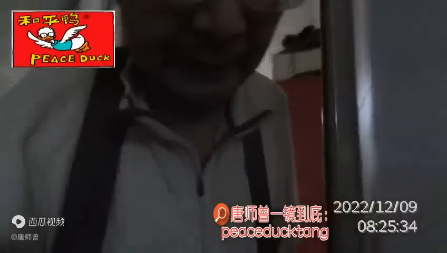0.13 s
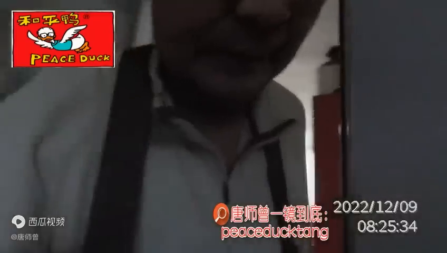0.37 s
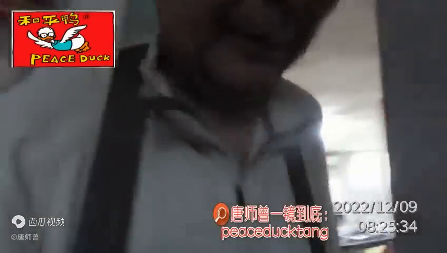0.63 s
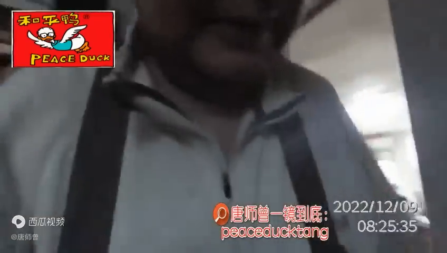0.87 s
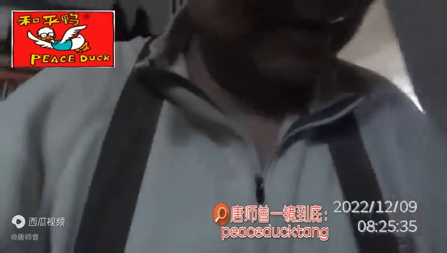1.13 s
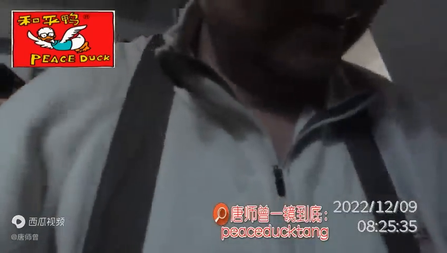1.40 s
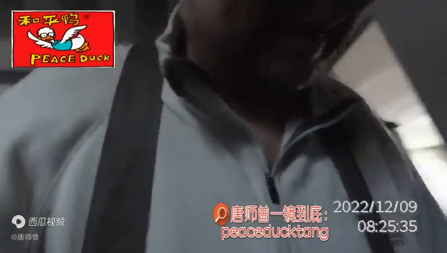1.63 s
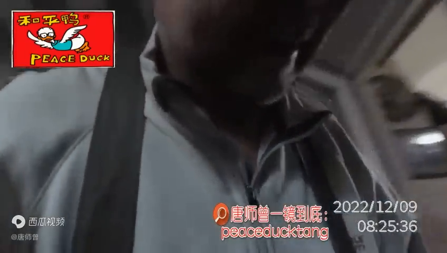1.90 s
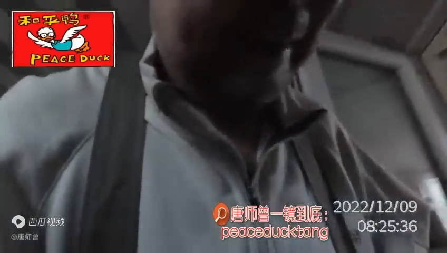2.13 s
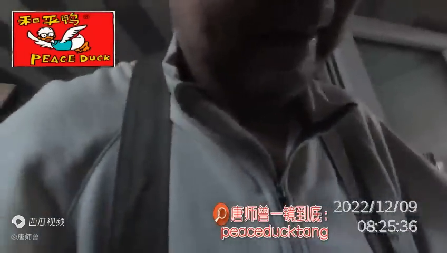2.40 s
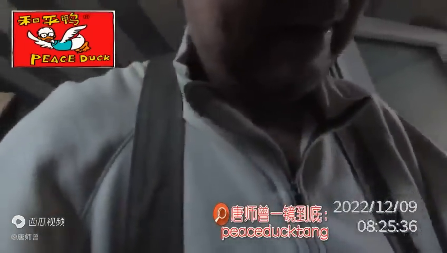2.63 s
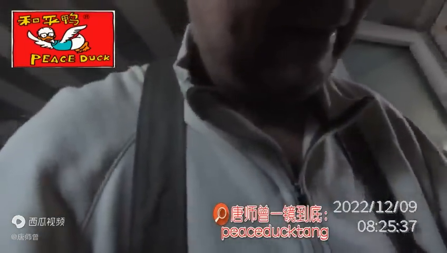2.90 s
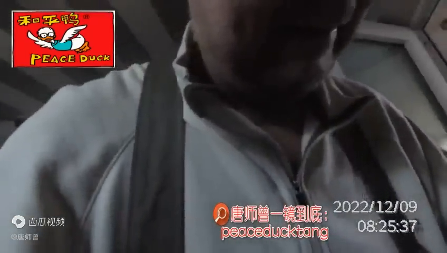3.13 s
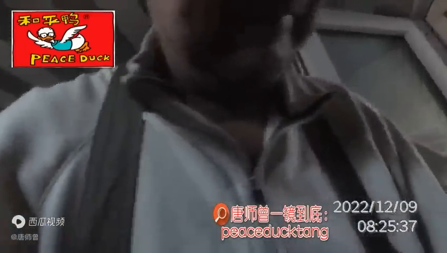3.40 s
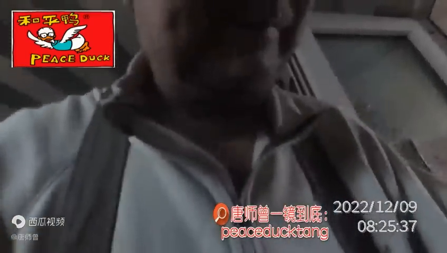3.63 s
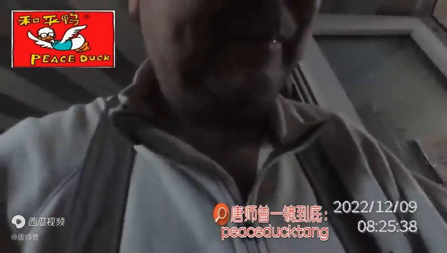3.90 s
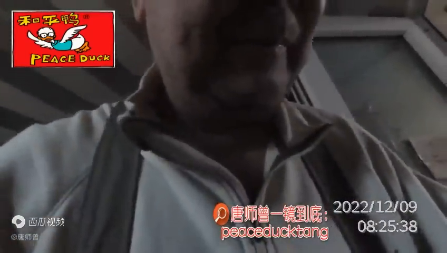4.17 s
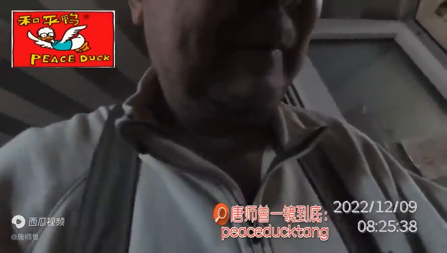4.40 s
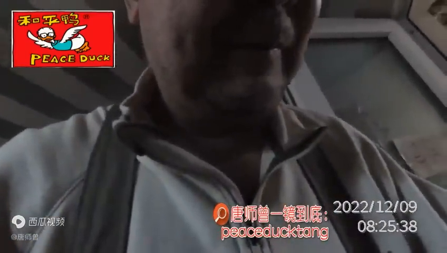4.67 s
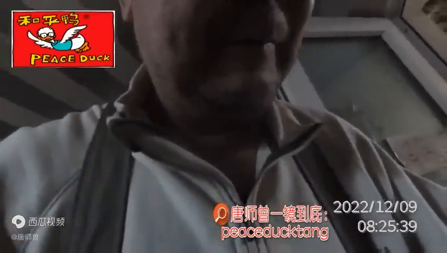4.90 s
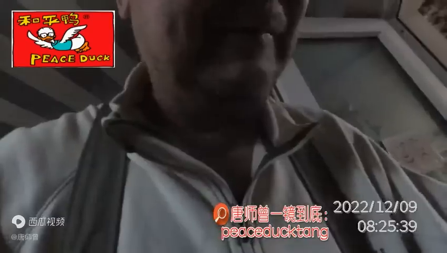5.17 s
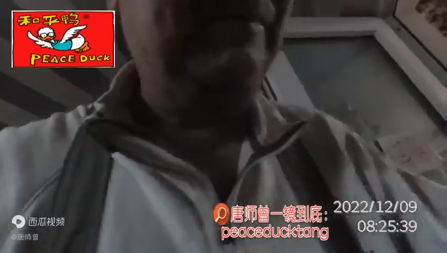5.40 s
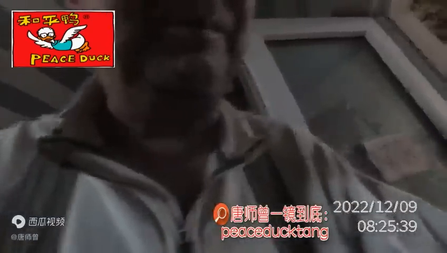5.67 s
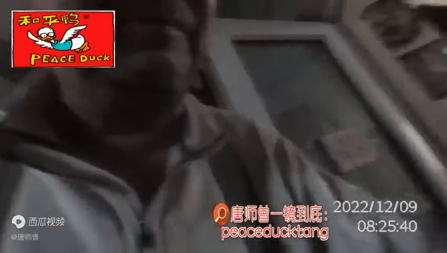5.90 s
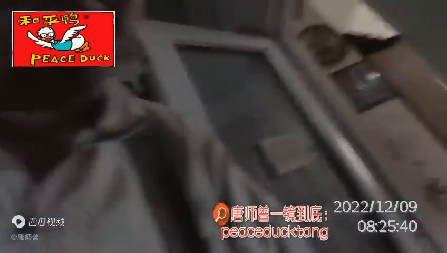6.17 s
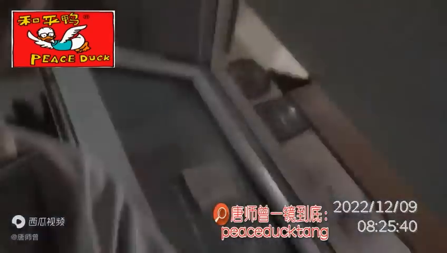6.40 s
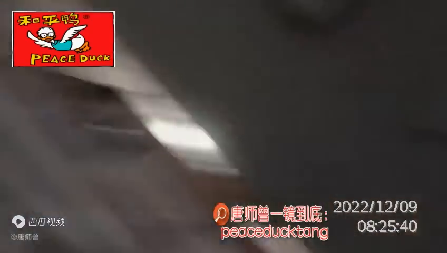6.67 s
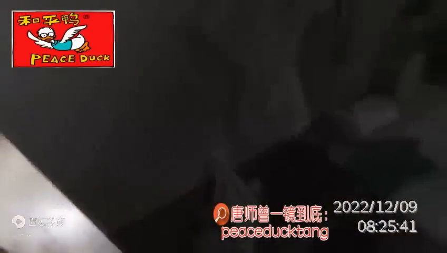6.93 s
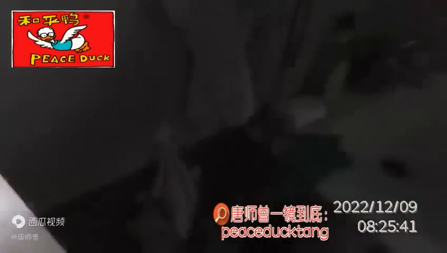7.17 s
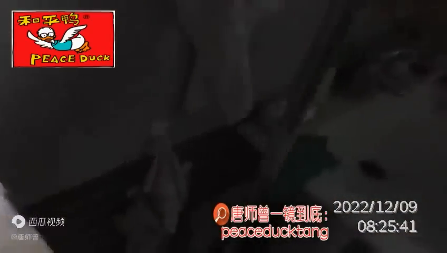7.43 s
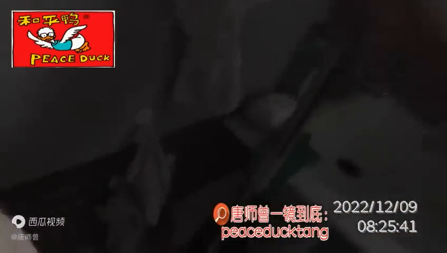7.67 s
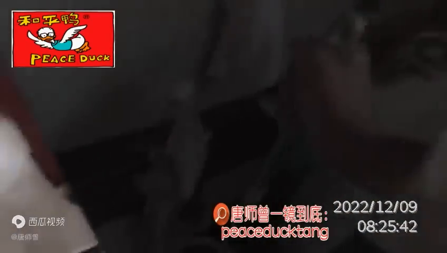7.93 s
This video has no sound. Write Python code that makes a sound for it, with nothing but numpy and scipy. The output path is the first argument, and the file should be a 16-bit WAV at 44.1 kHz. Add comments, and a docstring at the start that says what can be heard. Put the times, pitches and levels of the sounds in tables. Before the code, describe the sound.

Soft cloth rustles and hollow plastic thumps in a small bare room, then harsh handling bumps, a metallic jingle and distorted rattling knocks.

```python
"""Indoors, a towel is dragged over a hard floor with soft rustles and small ticks, over a faint hiss. From the
first half second hollow plastic is knocked, nudged and tapped: noise rings its body modes. After 4.5 s a
finger bumps and brushes the phone's left port, a nail snaps on the case, flat slaps fall and metal jingles.
At 5.5 s the phone is turned to face the work; then come loud close knocks that overload it. A small bare
room answers throughout as a short tail of diffuse noise."""
import sys
import numpy as np
from scipy import signal
from scipy.fft import rfft, irfft, next_fast_len
from scipy.io import wavfile
from scipy.ndimage import uniform_filter1d

SR = 44100
rng = np.random.default_rng(int(sys.argv[2]) if len(sys.argv) > 2 else 0)


def convert_level_to_amplitude(level_db):
    """Map a level in decibels to its linear amplitude factor."""
    exponent = np.asarray(level_db, float) / 20
    return 10 ** exponent


def wav_record(signal):
    """Record a signal, one row per channel, as 16-bit PCM in the file named by sys.argv[1]."""
    frames = np.transpose(np.atleast_2d(signal))
    bounded = np.clip(frames, -1, 1)
    # unit amplitude maps onto the largest positive 16-bit level
    quanta = np.round(bounded * 32767).astype(np.int16)
    wavfile.write(sys.argv[1], SR, quanta)


N = 355093
T = np.arange(N) / SR
# until the phone is turned, sound from the work reaches the left port this many samples late
TURN_S, LEFT_LAG = 5.5, 7

# modes of the hollow plastic body: f/Hz, level/dB, T60/s before ring() scales it by damp
BODY_MODES = [(258.5, -7, 0.089), (333.3, 3, 0.13), (401.8, 2, 0.16), (422.4, 9.5, 0.044), (494, 3, 0.052),
              (541, -3, 0.048), (643, -11.5, 0.14), (734.2, -14.5, 0.3)]
# colour of cloth noise: f/Hz, level/dB
CLOTH_COLOUR = [(88, -50), (150, -12.5), (427, -0.5), (1520, -2), (2170, -3.5), (3270, -5.5),
                (13000, -13.5)]
# rumble that the dragged towel sets up in the body: t/s, level/dB
DRAG_RUMBLE = [(0, -35.5), (.5, -41.5), (1.2, -57.5), (1.5, -53), (2.2, -36), (2.5, -37.5), (3.0, -28),
               (3.2, -51), (3.5, -55), (3.75, -29), (3.95, -54), (4.74, -40.5), (5.0, -22), (5.5, -50.5),
               (5.95, -44.5), (6.45, -43.5), (6.7, -22.5), (7.2, -28.5), (8.05, -24)]
# where the work lies across the two ports: t/s, lean to the left/dB
SIDE_OF_WORK = [(0, 3), (2.3, 4), (4.2, 8), (5.5, 3.5), (8.05, 2.5)]


def unit(x):
    """Scales to rms 1."""
    return x / np.sqrt(np.mean(x ** 2))


def colour(x, points):
    """Shapes the spectrum along the last axis by (Hz, dB) points; rms 1."""
    hz, db = np.transpose(points)
    size = next_fast_len(x.shape[-1])
    f = np.maximum(np.fft.rfftfreq(size, 1 / SR), 1)
    gain = convert_level_to_amplitude(np.interp(np.log(f), np.log(hz), db))
    return unit(irfft(rfft(x, size) * gain, size)[..., :x.shape[-1]])


def walk(rate, n=N):
    """Random levels held for 1 / rate s and slewed; spread near 1."""
    hold = int(SR / rate)
    steps = np.repeat(rng.standard_normal(n // hold + 1), hold)
    return 1.13 * uniform_filter1d(steps, hold)[:n]


def patchy(x, points, count, patchy_db, rate):
    """Noise of a given colour, in bands that each flicker on their own."""
    size, n = next_fast_len(x.shape[-1]), x.shape[-1]
    wide = rfft(colour(x, points), size)
    f = np.maximum(np.fft.rfftfreq(size, 1 / SR), 400)
    band = np.log(f / 400) / np.log(14000 / 400) * (count - 1)
    out = 0
    for k in range(count):
        share = np.clip(1 - np.abs(band - k), 0, 1)  # neighbouring bands overlap as triangles
        out = out + irfft(wide * share, size)[..., :n] * convert_level_to_amplitude(patchy_db * walk(rate, n))
    return out


def pair(n, alike):
    """Noise for the two ports that is partly the same."""
    noise = rng.standard_normal((3, n))
    return np.sqrt(alike) * noise[0] + np.sqrt(1 - alike) * noise[1:]


def burst(t, rise, t60):
    """Envelope that rises in about rise s while it dies away."""
    return (1 - np.exp(-t / rise)) * np.exp(-np.log(1000) * t / t60)


def swell(t, rise, t60):
    """Envelope that grows smoothly for rise s, then dies away."""
    grow = np.sin(np.pi / 2 * np.minimum(t / rise, 1)) ** 2
    return grow * np.exp(-np.log(1000) * np.maximum(t - rise, 0) / t60)


def ring(modes, t, damp, spread_db, detune):
    """One blow: decaying sines, each mode with its own strength and a slightly shifted pitch."""
    hz, db, t60 = np.transpose(modes)[:, :, None]
    chance = rng.standard_normal((2, len(modes), 1))
    strength = convert_level_to_amplitude(db + spread_db * chance[0])
    fade = np.exp(-np.log(1000) * t / (t60 * damp))
    pitch = hz * (1 + detune * chance[1])
    return np.sum(strength * fade * np.sin(2 * np.pi * pitch * t), axis=0)


def add(out, s, x, lean_db):
    """Mixes a sound in at time s, leaning left; the left port hears it late until the phone is turned."""
    for ch, (sign, lag) in enumerate([(0.97, LEFT_LAG * (s < TURN_S)), (-0.66, 0)]):
        i = int(s * SR) + lag
        part = np.broadcast_to(x, (2, x.shape[-1]))[ch, :N - i]
        out[ch, i:i + len(part)] += convert_level_to_amplitude(sign * lean_db / 2) * part


def hiss():
    """Steady faint noise, independent at the two ports, with bands that flicker."""
    # f/Hz, level/dB
    hiss_colour = [(20, -5), (333, -5), (1110, -5.5), (9000, -10), (13000, -5.5)]
    noise = rng.standard_normal((2, N))
    return patchy(noise, hiss_colour, count=5, patchy_db=5.5, rate=57) * convert_level_to_amplitude(-47)


def drag():
    """Towel fibres catch and slip: uneven small tugs shake the body, finer ones hiss."""
    rumble_db = np.interp(T, *np.transpose(DRAG_RUMBLE))
    # hiss gain at a rumble of -31 dB; it grows more slowly than the rumble
    away_db, facing_db, hiss_db_per_db = -43.5, -29, 0.75
    hiss_db = np.where(T < TURN_S, away_db, facing_db) + hiss_db_per_db * (rumble_db + 31)
    tugs = rng.standard_normal(N) * convert_level_to_amplitude(4.5 * walk(70) + 3 * walk(12))
    body = ring(BODY_MODES, T[:SR // 8], damp=0.64, spread_db=0, detune=0)
    rumble = unit(signal.fftconvolve(tugs, body)[:N])
    left = np.where(T < TURN_S, np.roll(rumble, LEFT_LAG), rumble)
    lean_db = np.interp(T, *np.transpose(SIDE_OF_WORK)) / 2 * np.array([[1], [-1]])
    rumble = np.array([left, rumble]) * convert_level_to_amplitude(rumble_db + lean_db)
    fibres = pair(N, 0.88) * convert_level_to_amplitude(2.5 * walk(400) + 2.5 * walk(60))
    return rumble + patchy(fibres, CLOTH_COLOUR, count=8, patchy_db=2.0, rate=38) * convert_level_to_amplitude(hiss_db)


def rustles():
    """Cloth crumples in soft puffs: flickering noise that swells and dies away."""
    # t/s, level/dB, rise/s, T60/s
    puffs = [(0.0, -28.5, 0.00068, 0.31), (0.181, -33.5, 0.013, 0.36), (0.451, -33.5, 0.018, 0.22),
             (.89, -27.5, 0.059, 0.14), (2.301, -38, 0.11, 0.5), (2.889, -27.5, 0.02, 0.5),
             (3.63, -31.5, 0.074, 0.27), (4.513, -27, 0.021, 0.065), (4.632, -35, 0.019, 0.53),
             (5.5, -39.5, 0.23, 2.1), (6.176, -25, 0.0053, 0.18), (6.485, -26, 0.083, 1.6),
             (6.655, -11, 0.044, 0.18), (7.455, -17, 0.03, 0.47), (7.602, -11, 0.021, 0.17)]
    out, t = np.zeros((2, N)), T[:SR]
    for s, db, rise, t60 in puffs:
        puff = patchy(pair(len(t), 0.22), CLOTH_COLOUR, count=6, patchy_db=3.0, rate=44.6)
        add(out, s, convert_level_to_amplitude(db) * puff * swell(t, rise, t60), 1.5)
    return out


def ticks():
    """A small hard part ticks with a few short modes; weaker chance ticks crackle, growing with the drag."""
    # t/s, peak level/dB
    clear_ticks = [(2.366, -7), (6.52, -16.5), (6.6702, -9.5), (7.2928, -10), (7.52, 0.5)]
    # f/Hz, level/dB, T60/s before damping
    tick_modes = [(1720, -2, 0.013), (3170, 5.5, 0.03), (4140, -8.5, 0.042)]
    out, t = np.zeros((2, N)), T[:SR // 30]
    when = rng.uniform(0, N / SR, 400)
    extra_db = 5 * np.minimum(rng.exponential(size=len(when)), 2.5)
    chance_db = np.interp(when, *np.transpose(DRAG_RUMBLE)) - 5 + extra_db
    for s, db in list(clear_ticks) + list(zip(when, chance_db)):
        detune = 0.08 * (db < -20) + 0.02  # weak ticks stray further in pitch
        tick = ring(tick_modes, t, damp=0.91, spread_db=2.6, detune=detune)
        lean_db = np.interp(s, *np.transpose(SIDE_OF_WORK))
        add(out, s, convert_level_to_amplitude(db) * tick / np.max(np.abs(tick)), lean_db)
    return out


def clinky(x, t60):
    """Small hard parts ring on at many close, chance pitches: a short dense tail, new for each blow."""
    t = T[:SR // 12]
    tail = rng.standard_normal(len(t)) * burst(t, 0.000095, t60)
    tail *= convert_level_to_amplitude(-3) / np.sqrt(np.sum(tail ** 2))
    return x + signal.fftconvolve(x, tail[None], axes=1)[:, :x.shape[1]]


def knocks():
    """Contact chatters on and rings the hollow body; a rattle of treble dies with it."""
    # knocks: t/s, blow level/dB, rattle against blow level/dB
    knock_list = [(0.546, -7.5, -4), (1.566, 0, -13.5), (1.583, -0.5, -13), (1.657, -6, -15),
                  (1.678, -7.5, -11), (1.719, -14, -17), (2.01, -15.5, -20), (2.285, -10, -13),
                  (2.305, -2.5, -22), (2.326, -8.5, -21.5), (2.537, -12, -15), (2.597, -11.5, -29),
                  (2.872, -9.5, -13), (3.03, -11, -24), (3.088, -14.5, -20.5), (3.389, -20.5, -19.5),
                  (4.117, -32, -11), (6.226, -9, -7.5), (6.24, 3, -9.5), (6.684, 2.5, -13),
                  (6.81, -21.5, -2.5), (6.832, -11.5, -29), (7.051, 2.5, -8), (7.171, 6, -10.5),
                  (7.291, -8.5, -15), (7.49, -0.5, -10), (7.618, 4, -10.5), (7.922, 1, -9.5),
                  (8.031, 9, -12)]
    # the body is shoved along and judders on: t/s, blow level/dB
    shove_list = [(0.426, -22), (2.454, -19), (2.708, -19.5), (2.801, -22), (2.899, -14), (3.213, -24),
                  (3.581, -9), (3.639, -11.5), (3.774, -12)]
    # colour of the rattle, tilted below for each blow: f/Hz, level/dB
    crack_colour = [(400, -60), (800, -0.5), (1500, -2.5), (2200, -4.5), (3200, -2), (13000, -15)]
    # rise/s of the rattle before and after the phone is turned
    rattle_rise_s = [0.0019, 0.0024]
    knock_t60_s, longer_s_per_db = 0.15, 0.0012  # chatter of a 0 dB knock; a stronger one lasts longer
    shove_t60_s, shove_treble_db = 0.36, -23.5
    hold = 1.113  # over 1: the chatter keeps up at first, then stops quickly

    out, t = np.zeros((2, N)), T[:SR // 3]
    blows = [(s, db, treble_db, knock_t60_s + longer_s_per_db * db) for s, db, treble_db in knock_list]
    blows += [(s, db, shove_treble_db, shove_t60_s) for s, db in shove_list]
    for s, db, treble_db, t60 in blows:
        chatter = (1 - np.exp(-t / 0.00042)) * convert_level_to_amplitude(-60 * (t / t60) ** hold) * convert_level_to_amplitude(3 * walk(110, len(t)))
        push = rng.standard_normal(len(t)) * (chatter + burst(t, 0.00012, 0.017))
        modes = ring(BODY_MODES, t[:SR // 8], damp=1.0, spread_db=2.9, detune=0.017)
        body = signal.fftconvolve(push, modes)[:len(t)]
        # the blow level follows the rms of the first thirtieth of a second
        body /= np.sqrt(np.mean(body[:SR // 30] ** 2)) * 2.49
        # a muffled blow rattles not only less but also duller
        dull = [(hz, c + 0.16 * treble_db * np.log2(hz / 2500)) for hz, c in crack_colour]
        rattle = patchy(pair(len(t), 0.4), dull, count=4, patchy_db=4.0, rate=49.0)
        rattle = clinky(rattle * burst(t, rattle_rise_s[int(s > TURN_S)], 1.204 * t60), 0.02)
        lean_db = np.interp(s, *np.transpose(SIDE_OF_WORK))
        add(out, s, convert_level_to_amplitude(db) * (body + convert_level_to_amplitude(treble_db) * rattle), lean_db)
    return out


def taps():
    """A smaller, higher box is tapped: a noise burst rings its modes."""
    # t/s, peak level/dB
    tap_list = [(0.547, -8), (0.667, -23), (0.932, -21), (5.571, -29.5), (5.617, -10.5), (5.664, -22.5)]
    # f/Hz, level/dB, T60/s
    box_modes = [(276, -1.5, 0.082), (864, 11, 0.023), (1020, 2, 0.036), (2170, -1, 0.011)]
    out, t = np.zeros((2, N)), T[:SR // 3]
    for s, db in tap_list:
        push = rng.standard_normal(len(t)) * burst(t, 0.0012, 0.15)
        box = signal.fftconvolve(push, ring(box_modes, t, damp=1, spread_db=0.67, detune=0.038))[:len(t)]
        add(out, s, convert_level_to_amplitude(db) * box / np.max(np.abs(box)), 1.5)
    return out


def brush():
    """Skin bumps and scrapes straight on the left port, loud enough to clip; the right hears it faintly."""
    # scrape: t/s, dull level/dB, bright level/dB
    scrape_levels = [(4.93, -34, -45), (4.98, -10, -32), (5.03, -21, -30), (5.037, -10, -10),
                     (5.08, -13, -11), (5.135, -9, -14), (5.144, -40, -45), (5.153, -32, -40),
                     (5.17, -12, -24), (5.2, -14, -14), (5.235, -5, -11), (5.262, -15, -18),
                     (5.315, -21, -24), (5.322, -5, -17), (5.37, -8, -20), (5.436, -3, -11),
                     (5.447, -40, -40), (5.457, -19, -12), (5.474, -20, -12), (5.492, -60, -50)]
    # colour of the dull scrape: f/Hz, level/dB
    skin_colour = [(20, -12), (190, -8), (500, -0.5), (1250, -2.5), (2500, -7.5), (4000, -46)]
    # pitch of the air pocket under the finger: t/s, f/Hz
    pocket_pitch = [(5.0, 521.7), (5.33, 800), (5.365, 518), (5.43, 1020)]
    # a finger bumps the left port: t/s, peak level/dB, T60/s
    bump_list = [(4.51, -15, 0.038), (4.535, -5.5, 0.038), (4.629, -10, 0.021), (5.138, 7, 0.034),
                 (5.163, 6, 0.016), (5.444, 6, 0.0065)]
    right_dull_db, right_bright_db = -27.5, -18

    scrape = rng.standard_normal((4, N)) * convert_level_to_amplitude(2 * walk(200))
    # the pocket is slow noise carried up to the moving pitch
    turn = 2 * np.pi * np.cumsum(np.interp(T, *np.transpose(pocket_pitch))) / SR
    slow = uniform_filter1d(uniform_filter1d(scrape[2:], size=60), size=60)
    pocket = unit(slow[0] * np.cos(turn) + slow[1] * np.sin(turn))
    low = patchy(scrape[0], skin_colour, count=5, patchy_db=-0.5, rate=31) + convert_level_to_amplitude(-5.0) * pocket
    bright_colour = [(1200, -30), (2600, 3.5), (3600, 0.0), (4600, -6), (13000, -19)]  # f/Hz, level/dB
    high = patchy(scrape[1], bright_colour, count=7, patchy_db=4.0, rate=51)
    s, low_db, high_db = np.transpose(scrape_levels)
    low = unit(low) * convert_level_to_amplitude(np.interp(T, s, low_db, -200, -200))
    high = high * convert_level_to_amplitude(np.interp(T, s, high_db, -200, -200))

    t = T[:SR // 10]
    bump_colour = [(40, -11.5), (300, -1.0), (1500, -21.5), (13000, -40)]  # f/Hz, level/dB
    for s, db, t60 in bump_list:
        bump = colour(rng.standard_normal(len(t)), bump_colour) * burst(t, 0.00045, t60)
        low[int(s * SR):][:len(t)] += convert_level_to_amplitude(db) * bump / np.max(np.abs(bump))
    return low * convert_level_to_amplitude([[0], [right_dull_db]]) + high * convert_level_to_amplitude([[0], [right_bright_db]])


def snaps():
    """A fingernail snaps on the case itself: dry decaying sines, a few cycles long."""
    # t/s, level/dB, f/Hz
    snap_list = [(4.5352, 7, 2870), (4.628, -5.5, 2110), (4.7443, -1, 1510)]
    out, t = np.zeros((2, N)), T[:SR // 50]
    for s, db, hz in snap_list:
        add(out, s, convert_level_to_amplitude(db) * np.sin(2 * np.pi * hz * t) * burst(t, 0.0002, 0.005), 6.0)
    return out


def slaps():
    """Bright flat blows and ticks close to the phone: broad noise, sharp at the front."""
    # t/s, level/dB at the start, T60/s, lean to the left/dB
    slap_list = [(4.751, -3.5, 0.2, 1.5), (4.8937, -5.5, 0.27, 1), (5.002, -13.5, 0.089, -13),
                 (5.072, -10, 0.18, -2), (5.404, -13, 0.013, -2), (5.435, -20, 0.025, -10)]
    # f/Hz, level/dB
    slap_colour = [(59, -54), (100, -14), (451, -0.5), (1730, -10.5), (2400, -2.5), (13000, -22)]
    out, t = np.zeros((2, N)), T[:SR // 3]
    for s, db, t60, lean_db in slap_list:
        slap = patchy(pair(len(t), 0.32), slap_colour, count=7, patchy_db=-4.5, rate=46)
        add(out, s, convert_level_to_amplitude(db) * slap * burst(t, 0.0012, t60), lean_db)
    return out


def jingle():
    """Thin metal, struck by the second slap and shaken on: noise rings high modes, mostly at the right."""
    # f/Hz, level/dB, T60/s
    metal_modes = [(12150, -4, 0.012), (12800, -9, 0.03)]
    shake = rng.standard_normal(N) * convert_level_to_amplitude(3.3 * walk(50))
    modes = ring(metal_modes, T[:SR // 20], damp=1, spread_db=0, detune=0)
    tone = unit(signal.fftconvolve(shake, modes)[:N])
    t = np.maximum(T - 4.895, 0)  # s since the strike
    struck = convert_level_to_amplitude(-9.5) * burst(t, 0.00081, 0.17)
    shaken = convert_level_to_amplitude(-36) * swell(t, 0.25, 0.44)
    return tone * (struck + shaken) * convert_level_to_amplitude([[-12], [0]])


def room(x, t60, wet_db):
    """Diffuse echoes of bare walls: a decaying noise tail, unlike at the two ports."""
    t = T[:int(.6 * SR)]
    tail = colour(rng.standard_normal((2, len(t))), [(300, -5.5), (13000, 4.0)]) * burst(t, 0.0085, t60)
    tail /= np.sqrt(np.sum(tail[0] ** 2))
    return x + convert_level_to_amplitude(wet_db) * signal.fftconvolve(x, tail, axes=1)[:, :N]


def scene():
    """Sounds in the air pass the room and lose deep bass, less once turned; brush, snaps and hiss do not."""
    # bass cut before and after the phone is turned: f/Hz
    bass_cut_hz = [255, 182]
    air = drag() + rustles() + ticks() + knocks() + taps() + slaps() + jingle()
    air = room(air, t60=0.26, wet_db=-6.5)
    # low thud carried by the hand
    thud = signal.sosfilt(signal.butter(2, 95, fs=SR, output="sos"), air)
    away, facing = (signal.sosfilt(signal.butter(3, hz, "high", fs=SR, output="sos"), air)
                    for hz in bass_cut_hz)
    heard = np.where(T < TURN_S, away, facing) + convert_level_to_amplitude(-11.5) * thud
    return heard + brush() + snaps() + hiss()


def band_limit(x):
    """A steep low-pass at the top of the band."""
    return signal.sosfilt(signal.butter(12, 13310, fs=SR, output="sos"), x)


def record(dry):
    """The input stage clips hard at full scale."""
    knee = 23.0  # higher bends more sharply
    clipped = dry / (1 + np.abs(dry) ** knee) ** (1 / knee)
    return band_limit(clipped)


dry = scene()
out = record(dry)
wav_record(out)
```